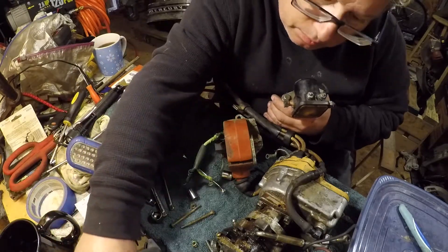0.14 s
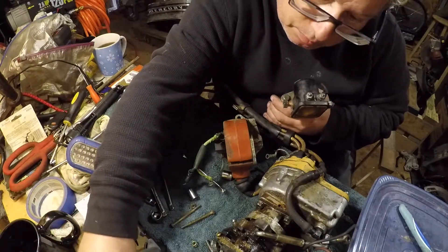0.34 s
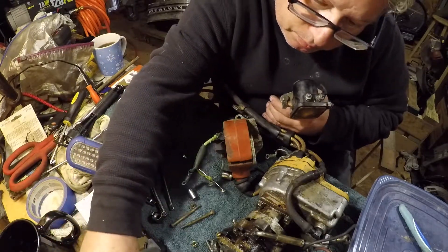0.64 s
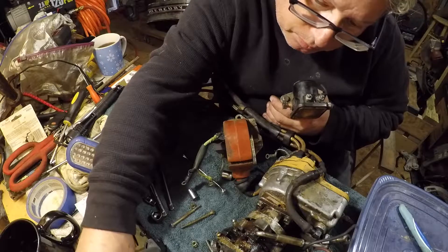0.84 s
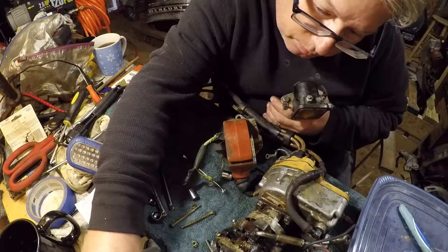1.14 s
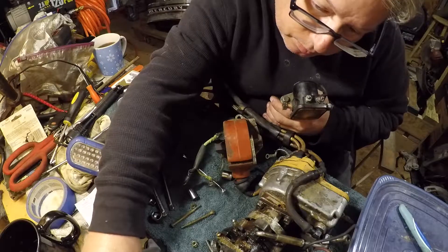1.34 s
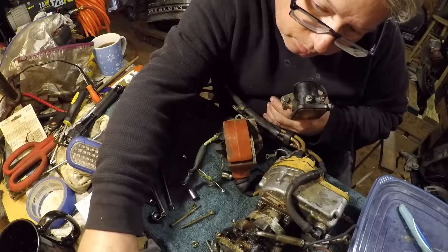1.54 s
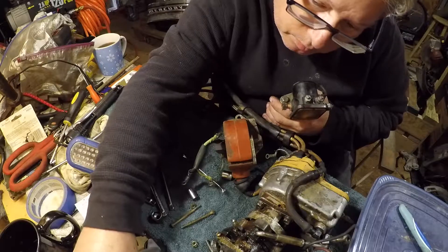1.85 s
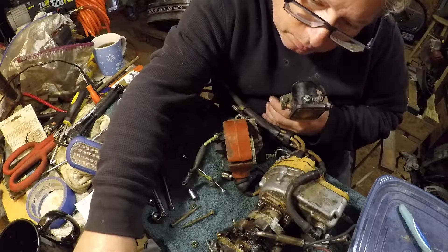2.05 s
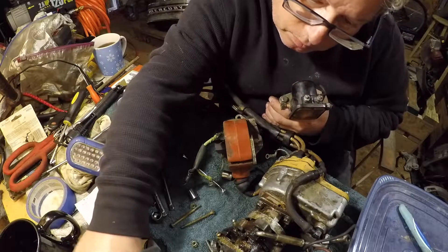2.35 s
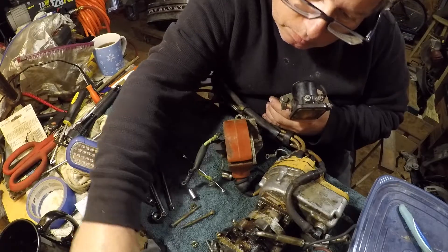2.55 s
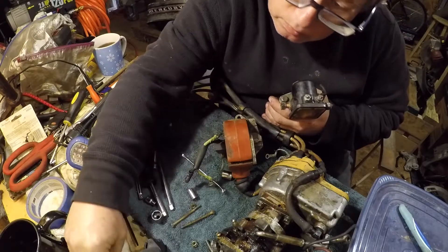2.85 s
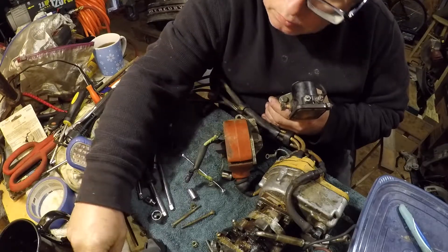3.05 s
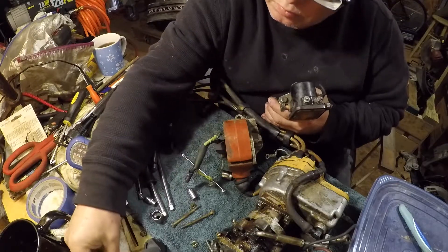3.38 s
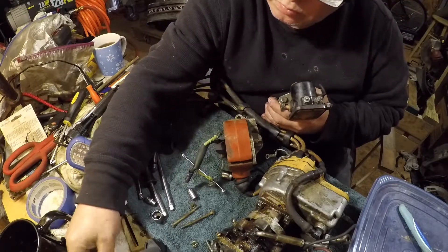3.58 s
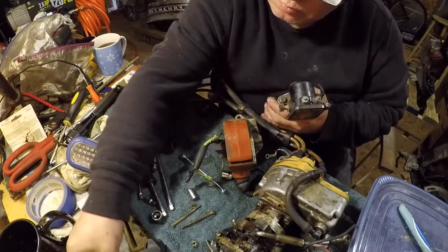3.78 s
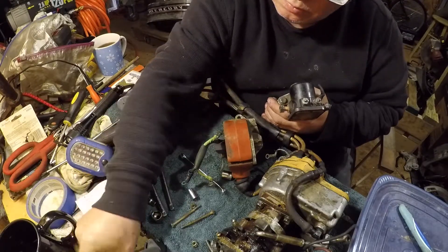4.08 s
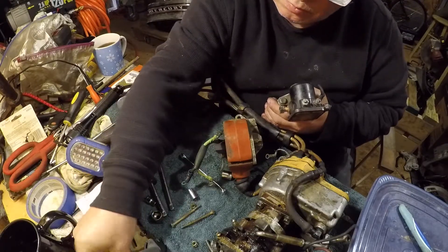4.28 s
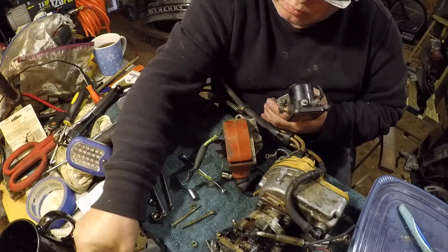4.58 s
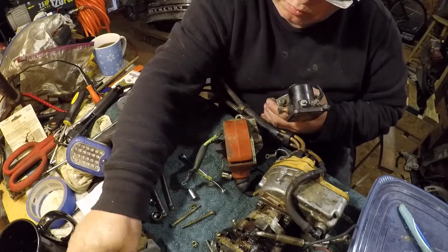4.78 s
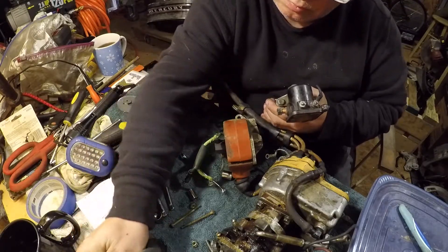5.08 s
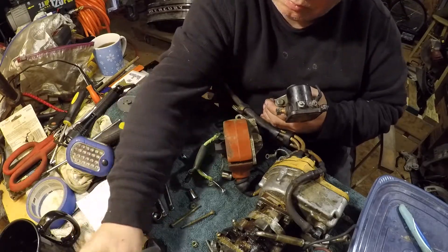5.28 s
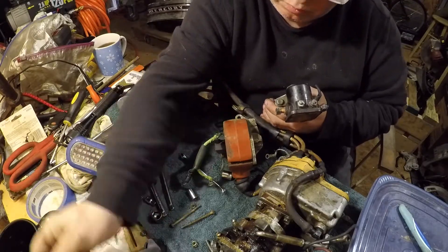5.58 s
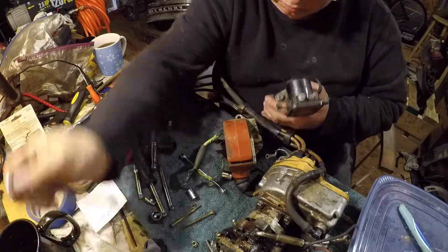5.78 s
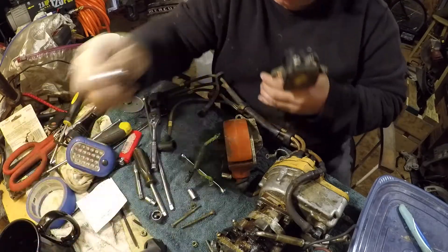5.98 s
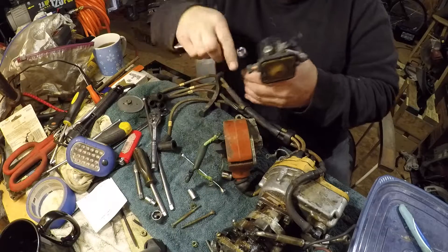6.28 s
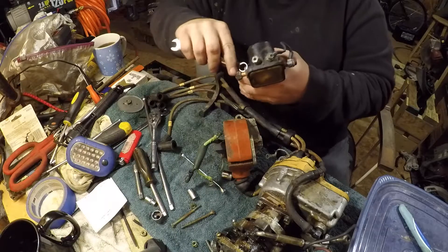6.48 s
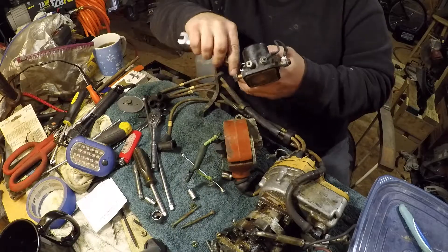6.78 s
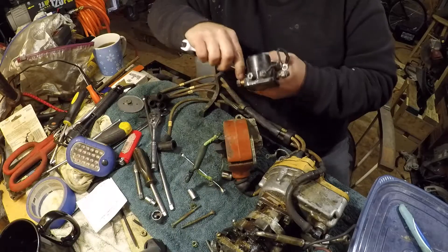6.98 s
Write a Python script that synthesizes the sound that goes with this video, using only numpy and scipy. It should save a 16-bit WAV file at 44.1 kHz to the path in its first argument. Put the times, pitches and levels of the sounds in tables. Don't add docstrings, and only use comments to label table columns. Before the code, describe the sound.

Very close on a wooden workbench, wrenches are picked through: busy hollow knocks, bright steel clinks and short gritty drags for the first two and a half seconds, then sparser taps and dull thuds. A wrench is grabbed with a bright clink and lifted away. After a quiet gap it taps a part, scrapes on and snaps home. The microphones sit on the bench, so boards boom and the loudest knocks distort.

```python
import sys
import numpy as np
from scipy import signal
from scipy.fft import rfft, irfft, next_fast_len
from scipy.io import wavfile
from scipy.ndimage import uniform_filter1d

SR = 44100
rng = np.random.default_rng(int(sys.argv[2]) if len(sys.argv) > 2 else 0)


def gain_from_db(level_db):
    decades = np.asarray(level_db, float) / 20
    return 10 ** decades


def inscribe(sig):
    pcm = np.round(np.clip(np.atleast_2d(sig).T, -1, 1) * 32767)
    wavfile.write(sys.argv[1], SR, pcm.astype(np.int16))


N = 314433

# [f/Hz, level/dB, t60/s]
SWAY_MODES = [(52.4, -15.5, 0.77), (80.07, 1.5, 0.44), (114.8, -1.5, 0.38)]
# [f/Hz, level/dB, t60/s]
BOOM_MODES = [(151, -1, 0.18), (183.3, 3.5, 0.15), (207.6, -7, 0.2), (246.4, 2, 0.07), (303.3, -2, .1)]
# [f/Hz, level/dB, t60/s]
BOARD_MODES = [(351.6, -2, 0.042), (395.1, -2.5, 0.079), (497, -20.5, 0.14), (543.5, -2.5, 0.076),
               (600, -6, 0.083), (668.5, -5, 0.058), (726, -2.5, 0.071), (822, -2, 0.026), (976, -4, 0.068),
               (1143, 2, 0.054)]
# [f/Hz, level/dB, t60/s]
EDGE_MODES = [(1300, -6, .03), (1520, -1, .055), (1700, -4, .03), (2040, -14, .04), (2300, -18, .025)]
# [f/Hz, level/dB, t60/s]
PILE_MODES = [(2020, -10, 0.07), (3080, -10, 0.025), (3220, -8.5, 0.1), (3730, -16.5, 0.062),
              (5350, -4, 0.049), (5680, -1, 0.08), (5860, 1, 0.091), (6820, -13, 0.05),
              (7780, -16.5, 0.026), (9600, -17.5, 0.06), (10500, -17, 0.051), (12400, -32, .05),
              (13200, -27.5, 0.054)]
# [f/Hz, level/dB, t60/s]
FREE_MODES = [(3300, -14, .03), (5600, -6, .03), (5900, -2, 0.056), (6020, 0.5, .13), (6450, -5, .04),
              (7600, -14, .04), (9000, -12, .04), (9400, -4, .07)]
# [f/Hz, level/dB, t60/s]
SOCKET_MODES = [(3400, -12, .02), (4800, 0, .015), (5200, 0, .02), (5950, -7, .015), (6500, -12, .015)]
# [f/Hz, level/dB, t60/s]
CHOSEN_MODES = [(3305, -15, .04), (3580, -4, .07), (4410, -7, .045), (5690, -16, .03), (6686, -3, .12),
                (7600, -14, .03), (9600, -15, .05), (10240, -12, .06), (11460, -18, .04), (12500, -24, .04),
                (14000, -29, .03)]
# [f/Hz, density/dB per Hz]
GRIT_SPECTRUM = [(880, -33.5), (1500, -11.5), (3340, 0), (6750, -5), (8700, -19), (10700, -38),
                 (13900, -50), (15500, -133)]


def evened(x):
    return x / np.sqrt(np.mean(x ** 2) + 1e-20)


def peaked(x):
    return x / (abs(x).max() + 1e-20)


def read(points, f_hz):
    f, value = np.transpose(points)
    return np.interp(np.log(f_hz + 1), np.log(f + 1), value)


def add(mix, start_s, sound):
    part = mix[max(round(start_s * SR), 0):][:len(sound)]
    part += sound[:len(part)]


def coloured(x, response):
    size = next_fast_len(len(x))
    return irfft(rfft(x, size) * response(np.fft.rfftfreq(size, 1 / SR)), size)[:len(x)]


def ring(modes, spread_db, near_hz=None, count=1, blur=.006, focus_db=10.0):
    hz, db, t60 = np.repeat(modes, count, 0).astype(np.float32).T[:, :, None]
    t = np.arange(int(SR * t60.max()), dtype=np.float32) / SR
    luck = rng.standard_normal((len(hz), 3, 1), dtype=np.float32)
    if near_hz:
        db = db - focus_db * abs(np.log2(hz / near_hz))
    detuned_hz = hz * (1 + blur * luck[:, 1])
    swing = np.sin(2 * np.pi * detuned_hz * t) * np.sign(luck[:, 2])
    strength = gain_from_db(db + spread_db * luck[:, 0])
    return (strength * np.exp(-6.908 * t / t60) * swing).sum(0)


def chatter(t60_s, size):
    t = np.arange(size) / SR
    force = rng.standard_normal(size) * rng.exponential(1, size) ** 1.35
    decay = gain_from_db(-60 * t / np.clip(t60_s, .002, .2))
    return force * decay * np.minimum(t / (0.039 * t60_s), 1)


def scrape(size, modes, grit_db, blur=0.012):
    run_in = 3000
    slips = rng.standard_normal(size + run_in) * rng.exponential(1, size + run_in) ** 0.9
    body = ring(modes, 1.8, count=3, blur=blur)
    tone = evened(signal.fftconvolve(slips, body)[run_in:size + run_in])
    grit = evened(coloured(slips, lambda f: gain_from_db(read(GRIT_SPECTRUM, f)))[run_in:])
    return evened(tone + gain_from_db(grit_db) * grit)


def hiss():
    # [f/Hz, density/dB per Hz]
    mid_spectrum = [(24, -48.5), (40, -25), (85, -10), (168, -10), (400, -9), (955, -12), (11000, -36),
                    (14300, -66)]
    # [f/Hz, density/dB per Hz]
    side_spectrum = [(24, -58), (40, -33), (228, -7), (420, -3.5), (955, -2.5), (4200, -30), (11000, -35),
                     (14300, -62)]
    # [f/Hz, density/dB per Hz]
    top_spectrum = [(13500, -54), (15500, -85)]
    a, b = rng.standard_normal((2, N))
    mid = evened(coloured(a, lambda f: gain_from_db(read(mid_spectrum[:-1] + top_spectrum, f))))
    side = evened(coloured(b, lambda f: gain_from_db(read(side_spectrum[:-1] + top_spectrum, f))))
    mid, side = gain_from_db(-42.5) * mid, gain_from_db(-37) * side
    return np.array([mid + side, mid - side])


def leaning():
    # [t/s, level/dB]
    pressure_points = [
        (0.0, -41.5),
        (1.98, -40),
        (2.74, -47.5),
        (5.75, -44.5),
    ]
    s, db = np.transpose(pressure_points)
    t = np.arange(N) / SR
    lift_off = np.clip((5.85 - t) / 0.3, 0, 1)
    return gain_from_db(np.interp(t, s, db)) * lift_off * scrape(N, SWAY_MODES + BOOM_MODES, -59)


def sway(s, db):
    push = signal.windows.hann(300)
    return s - .004, gain_from_db(db) * peaked(signal.fftconvolve(push, ring(SWAY_MODES, 2.0, blur=0.0086)))


def add_sways(bench):
    # [t/s, peak/dB]
    blows = [(0.131, -11), (0.444, -14.5), (0.561, -17), (0.627, -24), (0.689, -10.5), (0.976, -20),
             (1.036, -11), (1.186, -20.5), (1.353, -18), (1.429, -20.5), (1.627, -19), (1.704, -19),
             (1.874, -14.5), (1.977, -12), (2.13, -26), (2.295, -10), (2.499, -15.5), (3.104, -29),
             (3.203, -27), (3.243, -25), (3.979, -21), (4.259, -17.5), (4.336, -14.5), (4.478, -26),
             (4.709, -31.5), (5.035, -16.5), (5.267, -13.5), (5.31, -23), (5.545, -20.5)]
    for row in blows:
        add(bench, *sway(*row))


def knock(s, db, boom_db, edge_db, hz, t60_s, free, focus_db):
    force = chatter(t60_s, size=2000)
    dwell_s = np.clip((.0004 - .000042 * edge_db) * np.sqrt(380 / hz), .0003, .003)
    contact = np.sin(np.pi * np.minimum(np.arange(140) / SR / dwell_s, 1)) ** 2
    padded, pushes = np.convolve(force, contact), np.convolve(abs(force), contact)

    boom = peaked(signal.fftconvolve(padded, ring(BOOM_MODES, 1.4, blur=0.015)))

    held_boards = np.multiply(BOARD_MODES, (1, 1, free))
    board_ring = ring(held_boards, 1.35, hz, count=2, blur=0.025, focus_db=focus_db)
    boards = peaked(signal.fftconvolve(padded + 0.48 * pushes, board_ring))

    held_edge = np.multiply(EDGE_MODES, (1, 1, free ** 2.5))
    edge = peaked(signal.fftconvolve(force, ring(held_edge, 1.6, count=3, blur=0.025)))

    t = np.arange(8000) / SR
    noise = rng.standard_normal(len(t))
    buzz = peaked(coloured(noise, lambda f: (f / 300) ** 2 / (1 + (f * dwell_s / 0.68) ** 5.35)))
    buzz_gain = gain_from_db(-15.5 - 60 * t / (0.28 * free ** 1.5)) * np.minimum(t / 0.0015, 1)

    sound = gain_from_db(boom_db) * boom
    add(sound, 0, boards)
    add(sound, 0, gain_from_db(edge_db) * edge)
    add(sound, 0, buzz_gain * buzz)
    return s - .0007, gain_from_db(db) * sound


def add_knocks(bench):
    # [t/s, peak/dB, boom/dB rel, edge/dB rel, loudest board f/Hz]
    raps = [(0.133, -8.5, 3, -37, 400), (0.147, -11, -7.5, -29, 330), (0.421, -29, -22, -31, 720),
            (0.431, -4, -24, -33, 740), (0.688, -12.5, 1.5, -19, 386), (0.968, -14, -6, -16, 540),
            (0.996, -14.5, -5, -14, 540), (1.026, -8, 2, -8, 900), (1.033, -2, -3.5, -12.5, 350),
            (1.049, -16.5, 3, -2, 400), (1.188, -20.5, 4, -6.5, 540), (1.422, -14, -3, -41.5, 350),
            (1.702, -6, 0.5, -7, 420), (1.978, -1, -3.5, -9, 520), (2.295, -18.5, 1.5, -57, 350),
            (2.458, -4.5, -3, -12, 400), (3.117, -8.5, -19.5, -8, 400), (5.269, -23.5, 11.5, -30, 350),
            (5.33, -8.5, 2, -7.5, 370), (5.541, -18, 6, -27, 360)]
    tumbles = [(0.624, -9.5, 0.5, -11, 352), (1.092, -25.5, 7.5, -2, 350), (1.357, -3.5, -1, -10.5, 377),
               (1.878, -10, -9, -13, 384), (2.005, -23.5, 10.5, -27, 385), (2.126, -20.5, -2, -38, 360),
               (2.435, -7, -15, -25, 393), (2.778, -6.5, -13, -6, 397), (2.808, -14, -14, -8, 400),
               (3.219, -12, -6.5, -21, 385), (3.241, -3, -7, -7, 420), (4.282, -12.5, -3.5, -28, 385),
               (4.342, -24.5, -2.5, -20, 400), (5.049, -26.5, 13.5, -25, 388)]
    mid_taps = [(0.441, -6, -11, -10.5, 800), (0.452, -2.5, -2, -14.5, 550), (0.49, -14, 4, -21, 750),
                (0.552, -11, -8, -14.5, 557), (1.334, -14, -16, -26, 740), (1.918, -21, -3, -20, 400),
                (2.493, -2.5, -3, -9, 503), (2.736, -31, 6.5, -17, 560), (2.772, -27, -10.5, -6.5, 910),
                (3.106, -5, -10, -2, 1000), (3.193, -4.5, -10, -33.5, 544), (4.701, -19, -6, -9.5, 400),
                (5.004, -17.5, -8, -24, 546), (5.305, -11, -18, -2, 635), (5.34, -13.5, -2, -3.5, 595)]
    thuds = [(3.979, -4, -12, -16, 390), (3.986, -11, -8, -30, 726), (4.249, -13, -8, -34, 480),
             (4.2565, -3, -11, -22, 750), (4.27, -4, -6, -14, 420), (4.48, -2, -8, -9, 600),
             (4.487, -6, -5, -25, 390), (4.713, -5, -3, -9, 600), (1.978, -5, -10.5, -9, 1090),
             (2.445, -12, -10, -8, 600), (0.623, -6, -8, -6, 600), (2.98, -32, 4, -30, 350),
             (2.88, -33, 2, -30, 380)]
    # [chatter t60/s, share of free ring time left by the hand, focus/dB per octave]
    rap_kind = (.015, 1.01, 24)
    tumble_kind = (.047, .99, 18)
    mid_tap_kind = (.035, .98, 20)
    thud_kind = (.008, .6, 26)
    for kind, rows in ((rap_kind, raps), (tumble_kind, tumbles),
                       (mid_tap_kind, mid_taps), (thud_kind, thuds)):
        for row in rows:
            add(bench, *knock(*row, *kind))


def clink(tool, s, db, hz, ring_db):
    steel = ring(tool, 0.67, hz, count=3, blur=0.008)
    sound = gain_from_db(db + ring_db) * peaked(signal.fftconvolve(chatter(0.013, size=1000), steel))
    start_s, snap = crack(s, db, hz)
    add(sound, 0, snap)
    return start_s, sound


def add_clinks(bench):
    # [t/s, crack/dB, crack f/Hz, ring/dB rel]
    pile_clinks = [(0.441, -16, 2470, -16), (0.6198, -13, 5400, -9), (0.6745, -24, 4950, -10),
                   (0.6986, -33, 3380, 7), (1.0312, -9, 2700, -7.5), (1.05, -11, 7000, -8),
                   (1.091, -24, 5500, -8), (1.187, -28, 5900, -18), (1.3584, -4.5, 6200, -19),
                   (1.632, -14, 5900, -12), (1.701, -2.5, 3800, -19), (1.731, -30.5, 4900, -10.5),
                   (1.977, -7, 2480, -20)]
    free_clinks = [
        (1.4243, -26.5, 6200, -2),
        (2.005, -20.5, 5940, 1.6),
    ]
    socket_clinks = [
        (3.2126, -44, 4900, 10),
        (5.032, -37, 5100, 7.8),
    ]
    chosen_clinks = [
        (5.2919, -26, 3580, -43),
        (5.3243, -9, 5130, -21),
        (5.444, -45.5, 4450, 7.5),
        (5.534, -14.5, 5600, 0.5),
    ]
    ticks = [(0.5523, -31, 5800, 0), (0.5583, -28, 3010, -3), (0.5623, -24, 5710, 0),
             (0.5822, -20, 5820, 0), (0.598, -27, 3250, -3), (0.9608, -27, 5680, 0), (0.9708, -23, 5670, 0),
             (0.9783, -19, 5830, 0), (0.995, -22, 3200, -3), (1.6178, -28, 5750, 0), (1.6253, -23, 5650, 0),
             (4.335, -44, 3800, -20)]
    for tool, rows in ((PILE_MODES, pile_clinks), (FREE_MODES, free_clinks), (SOCKET_MODES, socket_clinks),
                       (CHOSEN_MODES, chosen_clinks), (PILE_MODES, ticks)):
        for row in rows:
            add(bench, *clink(tool, *row))


def slide(tool, kind, start_s, length_s, *start_db):
    grit_db, attack_s, release_s, *fades = kind
    t = np.arange(0, length_s, 1 / SR)
    db, boom_db, steel_db = (d - f * np.maximum(t - attack_s, 0) for d, f in zip(start_db, fades))

    def board_band(f):
        return 1 / np.sqrt((1 + (f / 750) ** 4) * (1 + (330 / (f + 1)) ** 6))

    boards = gain_from_db(db + 2.5) * coloured(scrape(len(t), BOARD_MODES, -23.5, 0.035), board_band)
    boom = gain_from_db(boom_db) * scrape(len(t), BOOM_MODES, -57, 0.046)
    edge = gain_from_db(np.minimum(steel_db + 6.0, db - 10.5)) * scrape(len(t), EDGE_MODES, -14.5, 0.018)
    steel = gain_from_db(steel_db) * scrape(len(t), tool, grit_db)
    pressure = gain_from_db(27 * uniform_filter1d(rng.standard_normal(len(t)), size=250))
    envelope = np.clip(np.minimum(t / attack_s, (length_s - t) / release_s), 0, 1) ** 1.26
    return start_s, (boards + boom + edge + steel) * envelope * pressure


def add_slides(bench):
    # [f/Hz, level/dB, t60/s]
    spread_modes = [(3700, -5.5, .015), (5550, 2, .02), (6600, -1.5, .015), (7400, -7.5, .015),
                    (9250, -15, .02), (10600, -12, .04), (13000, -30, .03)]
    # [start t/s, length/s, boards/dB, boom/dB, steel/dB]
    drags = [
        (0.543, 0.082, -19, -19.5, -30),
        (0.957, .077, -19.5, -21, -25.5),
        (1.605, .096, -22.5, -33, -30.5),
    ]
    settlings = [
        (0.63, .11, -21.5, -20, -37),
        (1.05, 0.12, -32, -31.5, -43),
    ]
    rolls = [
        (1.417, .16, -20, -17, -26),
        (2.001, 0.095, -28, -22, -43.5),
    ]
    shoves = [
        (2.43, 0.17, -11.5, -17, -32),
        (3.708, 0.091, -28, -42, -72),
        (4.25, 0.19, -25, -19.5, -76),
        (4.695, 0.144, -20.5, -23, -35.5),
    ]
    nudges = [
        (4.405, .065, -49, -35, -50),
        (4.865, 0.1, -56, -62, -43),
        (4.99, 0.11, -41.5, -30.5, -47),
    ]
    picks = [
        (5.283, 0.16, -11.5, -12, -16),
        (5.532, 0.09, -41, -19, -31),
    ]
    pulls = [
        (1.833, 0.16, -27, -23.5, -32),
        (2.5, 0.12, -30, -30.5, -47),
    ]
    skids = [
        (1.342, .018, -42, -42, -36),
        (1.679, .023, -35.5, -33, -30),
        (2.41, .027, -33, -29, -37),
        (2.755, 0.024, -45, -43, -41),
        (4.685, .02, -42, -42, -50),
    ]
    lifts = [
        (5.479, .056, -55, -34.5, -36.5),
    ]
    # [grit/dB, attack/s, release/s, board fade/dB per s, boom fade/dB per s, steel fade/dB per s]
    drag_kind = (-5.5, .02, .008, 171, 61, 105)
    settle_kind = (-1.4, .0061, .036, 251, 121, 161)
    roll_kind = (-5, .0075, .051, 345, 225, 230)
    shove_kind = (11, .017, .036, 245, 152, 225)
    nudge_kind = (-13, .03, .03, 152, 102, 280)
    pick_kind = (-1.4, .019, .036, 385, 325, 405)
    pull_kind = (-1, .021, .051, 125, 42, 125)
    skid_kind = (-2.4, .023, .003, 31, 32, 33)
    lift_kind = (-17, .044, .004, 34, 35, 36)
    for tool, kind, rows in ((PILE_MODES, drag_kind, drags), (PILE_MODES, settle_kind, settlings),
                             (FREE_MODES, roll_kind, rolls), (PILE_MODES, shove_kind, shoves),
                             (SOCKET_MODES, nudge_kind, nudges), (CHOSEN_MODES, pick_kind, picks),
                             (spread_modes, pull_kind, pulls), (PILE_MODES, skid_kind, skids),
                             (CHOSEN_MODES, lift_kind, lifts)):
        for row in rows:
            add(bench, *slide(tool, kind, *row))


def crack(s, db, hz):
    t = np.arange(6000) / SR

    def snap_band(f):
        return gain_from_db(read(GRIT_SPECTRUM, f)) * (0.49 + 1 / (1 + ((f - hz) / 900) ** 2))

    air = coloured(rng.standard_normal(len(t)), snap_band)
    decay = gain_from_db(-60 * t / 0.02) + gain_from_db(-31 - 60 * t / 0.13)
    return s - .0012, gain_from_db(db) * peaked(air * decay * np.minimum(t / 0.0025, 1) ** 2)


def add_cracks(bench):
    # [t/s, crack/dB, crack f/Hz]
    snaps = [(2.4328, -22, 5240), (2.4417, -18, 2730), (2.4948, -27.5, 2500), (2.7794, -20, 3300),
             (3.1069, -17, 2540), (3.2355, -16, 4200), (3.9803, -31, 2550), (4.2565, -38, 3820),
             (4.2705, -31, 2690), (4.4807, -33, 2560), (4.7134, -24, 2580)]
    for row in snaps:
        add(bench, *crack(*row))


def add_part_clinks(part):
    # [f/Hz, level/dB, t60/s]
    tapped_modes = [(1576, 15, 0.11), (4160, 5, 0.07), (5170, -2, 0.022), (5600, 3, 0.04), (6650, 3, 0.07)]
    # [t/s, crack/dB, crack f/Hz, ring/dB rel]
    taps = [
        (6.4529, -26.5, 5060, 7),
        (6.4907, -46, 6750, 8.7),
    ]
    for row in taps:
        add(part, *clink(tapped_modes, *row))


def fitting():
    # [f/Hz, level/dB, t60/s]
    part_modes = [(1640, -12, .03), (2640, -14, .02), (3080, -6, .02), (3340, -5, .022), (4200, -10, .015),
                  (5490, -5, .02), (5900, -7, .02), (6930, 0, .024), (7250, -2, .035), (8270, -10.5, .025),
                  (9940, -15, .06), (11600, -22, .05), (12400, -27, .06), (12900, -31, .06)]
    # [t/s, level/dB]
    scrape_points = [
        (6.566, -43.5),
        (6.578, -25),
        (6.605, -19),
        (6.639, -28.5),
        (6.68, -37),
        (6.72, -47),
        (6.76, -60),
    ]
    s, db = np.transpose(scrape_points)
    t = np.arange(s[0], s[-1], 1 / SR)
    fade = signal.windows.tukey(len(t), .1)
    return s[0], gain_from_db(np.interp(t, s, db)) * scrape(len(t), part_modes, -6, 0.014) * fade


def seating(tool, s, db):
    return s, gain_from_db(db) * peaked(np.convolve(np.hanning(9), ring(tool, .3, blur=.004)))


def add_seatings(part):
    # [f/Hz, level/dB, t60/s]
    struck_modes = [(1620, 0, .03), (1740, -7, .035), (3550, 3, .015), (3970, -4, .016), (5850, -3, .012),
                    (6950, -12, .008)]
    # [f/Hz, level/dB, t60/s]
    seated_modes = [(1620, -3, .03), (1850, 0, .024), (2060, -2, .026), (1720, -19, .11), (1930, -19, .15),
                    (2150, -19, .13), (3305, -13, .035), (3610, 0, .014), (3960, -4, .02), (6610, -20, .05)]
    # [t/s, peak/dB]
    contacts = [
        (6.632, -26),
        (6.6393, -1.5),
        (6.654, -2.5),
        (6.665, -20),
    ]
    for tool, row in zip((struck_modes, struck_modes, seated_modes, seated_modes), contacts):
        add(part, *seating(tool, *row))


def pair(mid):
    # [f/Hz, ratio/dB]
    width = [(60, -20), (130, -15), (290, -10), (620, 4), (1300, 3), (2400, -7), (4400, -1), (15000, -1)]
    # [f/Hz, ratio/dB]
    tilt = [(60, 0.5), (180, 0), (550, -4.0), (1650, 2.5), (4970, -0.5), (15000, -1)]
    # [f/Hz, phase/rad]
    lead = [(0, 0), (340, -0.2), (1000, 2.8), (3100, -0.3), (4650, 0.1), (6720, 9.3), (7410, 15.3),
            (10500, 4.5), (15200, -5.3)]
    # [f/Hz, share]
    loose = [(100, .3), (500, .7), (2000, .7), (5000, .92)]
    taps = rng.standard_normal((3, 600)) * gain_from_db(-60 * np.arange(600) / SR / 0.033)
    spot = np.repeat(rng.standard_normal((3, N // 3000 + 1)), 3000, 1)[:, :N]
    spot = uniform_filter1d(spot, 1500, 1)
    spot = spot / np.linalg.norm(spot, axis=0)
    scattered = signal.oaconvolve(spot * mid, taps / np.linalg.norm(taps[0]), axes=1).sum(0)[:N]

    def turned(f):
        ratio = gain_from_db(read(tilt, f)) * np.exp(1j * read(lead, f))
        turn = np.exp(1j * np.angle((ratio - 1) / (ratio + 1)))
        return gain_from_db(read(width, f)) * turn * np.sqrt(1 - read(loose, f) ** 2)

    side = coloured(mid, turned)
    side = side + coloured(scattered, lambda f: gain_from_db(read(width, f)) * read(loose, f))
    return np.array([mid + side, mid - side])


def ducking(tools):
    # [t/s, extra cut/dB]
    overloads = [
        (3.98, 32),
        (4.26, 13.5),
        (4.485, 32.5),
    ]
    hop = 64
    power_db = 10 * np.log10(abs(uniform_filter1d((tools ** 2).mean(0), 300)) + 1e-12)[::hop]
    over_db = 1.02 * np.maximum(power_db + 16.5, 0)
    t, held_db = np.arange(len(over_db)) * hop / SR, 0
    for share, recovery_s in ((1.0, 0.34), (0.17, 0.5)):
        log_peak = np.maximum.accumulate(np.log(over_db + 1e-3) + t / recovery_s)
        held_db = held_db + share * np.exp(log_peak - t / recovery_s)
    for s, db in overloads:
        held_db = np.maximum(held_db, (t > s) * db * np.exp(-abs(t - s) / 0.22))
    return gain_from_db(-np.interp(np.arange(N) / SR, t, held_db))


def scene():
    # [t/s, left over right/dB]
    hand = [(0, -1.2), (1.0, -0.2), (1.3, -1), (2.3, -0.5), (3.0, 0), (3.2, -2.5), (3.75, -6.5),
            (4.0, -4.5), (4.25, -1), (4.5, -3.5), (4.7, -0.3), (5.0, -4), (5.3, -0.8), (7.1, 1.5)]
    bench, part = leaning(), np.zeros(N)
    for add_source in (add_sways, add_knocks, add_clinks, add_slides, add_cracks):
        add_source(bench)
    add_part_clinks(part)
    add(part, *fitting())
    add_seatings(part)
    part = coloured(part, lambda f: 1 / (1 + (1100 / (f + 1)) ** 6))
    t = np.arange(N) / SR
    place_db = np.interp(t, *np.transpose(hand))
    tools = pair(bench + part) * gain_from_db([place_db / 2, -place_db / 2])
    tools = tools - .4 * (tools - part) * (np.arange(N) > 6.2 * SR)
    return tools + ducking(bench[None]) * hiss()


def roll_off(x):
    return signal.sosfilt(signal.butter(12, 15640, fs=SR, output="sos"), x)


def record(dry):
    cut = signal.sosfilt(signal.butter(3, 44, "high", fs=SR, output="sos"), dry)
    return roll_off(np.clip(cut, -1, 1))


dry = scene()
out = record(dry)
inscribe(out)
```